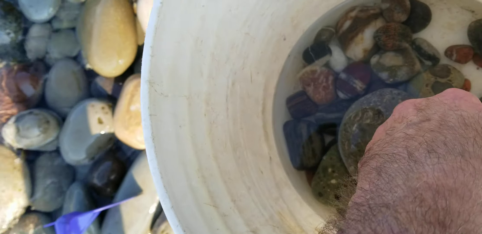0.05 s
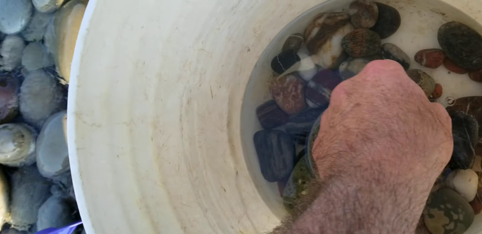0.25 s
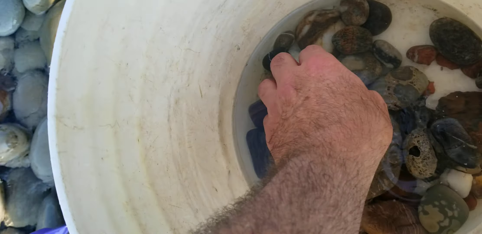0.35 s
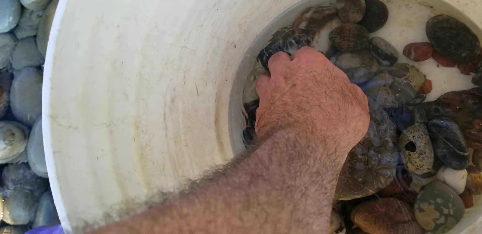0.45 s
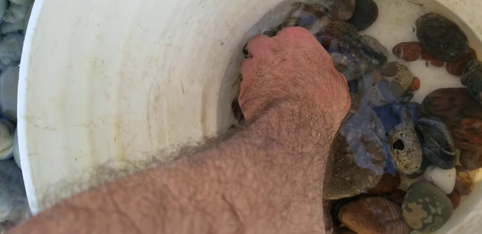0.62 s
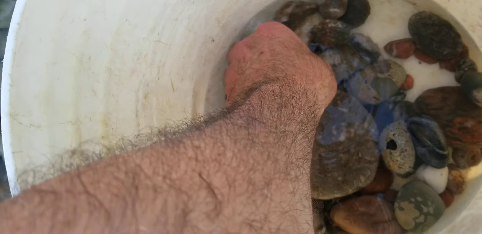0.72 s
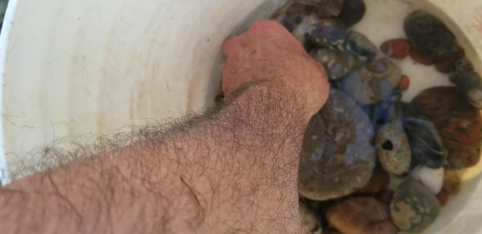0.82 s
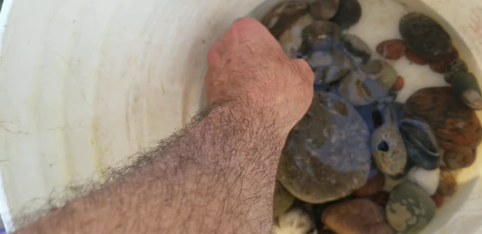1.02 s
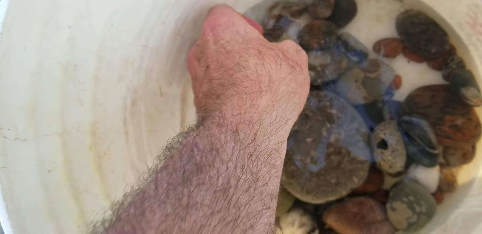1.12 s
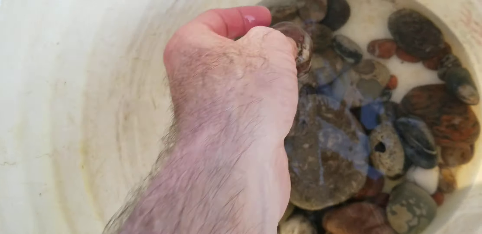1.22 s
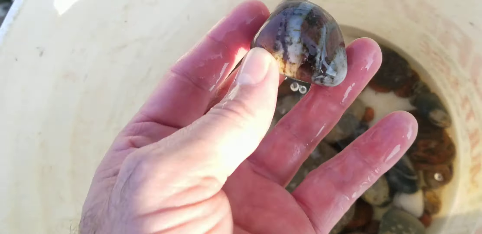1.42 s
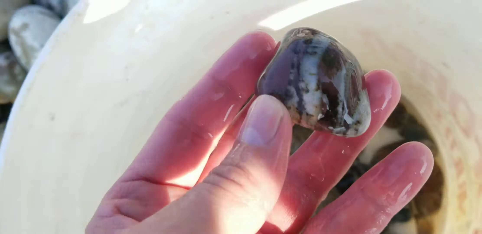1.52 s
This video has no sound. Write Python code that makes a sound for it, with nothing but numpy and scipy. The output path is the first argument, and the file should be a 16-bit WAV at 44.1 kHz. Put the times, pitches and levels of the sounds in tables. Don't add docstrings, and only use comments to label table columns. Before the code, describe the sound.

Wet stones clack and knock in a plastic bucket as a hand digs, then water drips.

```python
import sys
import numpy as np
from scipy import signal
from scipy.fft import rfft, irfft
from scipy.io import wavfile
from scipy.ndimage import uniform_filter1d

SR = 44100
rng = np.random.default_rng(int(sys.argv[2]) if len(sys.argv) > 2 else 0)


def boost_factor(decibels):
    exponent = np.asarray(decibels, float) / 20
    return 10 ** exponent


def inscribe(sig):
    pcm = np.round(np.clip(np.atleast_2d(sig).T, -1, 1) * 32767)
    wavfile.write(sys.argv[1], SR, pcm.astype(np.int16))


N = 68355

WET = dict(tick_db=-8, ring_db=10, top_db=-3, rise_s=0.00068, modes_db=-13)


def evened(x):
    return x / np.sqrt(np.mean(x ** 2) + 1e-20)


def peaked(x):
    power = uniform_filter1d(x.mean(0) ** 2, 130)
    return x / np.sqrt(power.max() + 1e-20)


def read(points, hz):
    f, value = np.transpose(points)
    return np.interp(np.log(hz + 1), np.log(f + 1), value)


def along(points):
    return np.interp(np.arange(N) / SR, *np.transpose(points))


def add(mix, s, sound):
    part = mix[:, round(s * SR):][:, :sound.shape[1]]
    part += sound[:, :part.shape[1]]


def sequence(rows, sound, **touch):
    out = np.zeros((2, N))
    for s, *row in rows:
        add(out, s, sound(*row, **touch))
    return out


def coloured(x, points):
    hz = abs(np.fft.fftfreq(2048, 1 / SR))
    log_gain = np.log(boost_factor(read(points, hz)))
    spectrum = np.exp(np.conj(signal.hilbert(log_gain)))
    taps = np.fft.ifft(spectrum).real[:1024]
    return signal.fftconvolve(x, taps[None], axes=1)[:, :x.shape[1]]


def noise_pair(count, same):
    a, b = rng.standard_normal((count, 2)).T
    same = np.clip(same, 0, 1)
    return np.array([a, same * a + np.sqrt(1 - same ** 2) * b])


def wobbly(count, depth):
    sway = uniform_filter1d(rng.standard_normal((count, 2)).T, 150, axis=1)
    return 1 + depth * evened(sway)


def across(x):
    lag = round(0.0004 * SR * rng.uniform(0.15, 1.2))
    late = np.r_[np.zeros(lag), x[1, :x.shape[1] - lag]]
    return np.array([x[0], late])


def rung(modes, t):
    spread_db = 3.0
    luck = rng.uniform(-1.43, 1, (len(modes), 4))
    out = 0
    for (f, db, t60), (a, b, c, d) in zip(modes, luck):
        decay = boost_factor(db + spread_db * a - 60 * t / t60)
        phase = 2 * np.pi * f * (1 + 0.013 * b) * t + np.array([[c], [d]])
        out = out + decay * np.sin(phase)
    return out


def field(points, same, patchy_db, size):
    f, s, z = signal.stft(noise_pair(N, same), SR, nperseg=size)
    patches = uniform_filter1d(rng.standard_normal(z.shape[1:]), 6, 0)
    patches = evened(uniform_filter1d(patches, 5, 1))
    gain = boost_factor(read(points, f)[:, None] + patchy_db * patches)
    return evened(signal.istft(z * gain, SR, nperseg=size)[1][:, :N])


def wind():
    # f/Hz, level/dB
    wind_spectrum = [(20, -52), (45, -7), (72, -1.5), (130, -12), (220, -27), (340, -32.5), (600, -37)]
    # t/s, level/dB
    gusts = [(0, -52), (.05, -41), (.12, -52), (.19, -45.5), (.25, -43), (.3, -51), (.45, -58.5),
             (.57, -47.5), (.7, -53.5), (.83, -45.5), (.95, -56), (1.4, -54), (1.55, -57)]
    rumble = field(list(wind_spectrum) + [(1200, -130)], 0, 0.84, size=2048)
    return boost_factor(along(gusts) + 6.5) * rumble


def wash():
    # f/Hz, level/dB
    water_spectrum = [(400, -13.5), (800, -14), (2500, -10.5), (3700, -15.5), (5600, -8), (8000, -21.5),
                      (11500, -13.5), (14300, -9.5)]
    # t/s, level/dB
    fade = [(0, 2.5), (.3, 4), (.6, -4.5), (1.1, -5.5), (1.55, -3)]
    water = field([(100, -63)] + list(water_spectrum), 0.033, 0.22, size=512)
    return boost_factor(-51.5 + along(fade)) * water


def drip(db, hz, t60, glide):
    t = np.arange(5000) / SR
    waver = 1 + 0.025 * evened(uniform_filter1d(rng.standard_normal(len(t)), 200))
    pitch = hz * waver * 2 ** (glide * t)
    tone = np.sin(2 * np.pi * np.cumsum(pitch) / SR)
    return boost_factor(db - 60 * t / t60) * np.minimum(t / 0.0015, 1) * tone * wobbly(len(t), 0.45)


def lapping():
    out = np.zeros((2, N))
    for when, size, pitch in rng.random((70, 3)):
        bubble = drip(-62.5 + 6 * size, 600 * 5 ** pitch, 0.07, 8 * size - 2)
        add(out, when * N / SR, bubble)
    return out


def dripping():
    # t/s, level/dB, f/Hz, t60/s, glide/(octaves/s)
    drips = [(1.15, -57, 620, 0.18, -3), (1.163, -66, 1610, .05, 2), (1.187, -52, 2030, 0.1, 0),
             (1.211, -51, 1680, 0.08, -7), (1.212, -51.5, 2860, 0.048, 5), (1.224, -52, 1770, 0.066, 3),
             (1.232, -52.5, 1017, 0.14, 12.5), (1.25, -60, 614, 0.17, 3.5), (1.267, -57, 1720, 0.084, 6),
             (1.315, -48, 2950, 0.035, -2.5), (1.335, -54, 2620, 0.091, -0.5), (1.366, -51, 943, 0.13, -4),
             (1.3775, -34.5, 2324, 0.084, -3), (1.381, -43, 2730, 0.07, 8), (1.408, -42.5, 2367, 0.058, -9),
             (1.408, -55, 860, 0.056, -3), (1.421, -48.5, 1570, 0.034, 2), (1.476, -52, 620, 0.085, 4),
             (1.479, -56.5, 1023, 0.093, 1.5), (1.497, -58, 1695, .08, 2)]
    return sequence(drips, drip)


def spit(db, hz):
    t = np.arange(1500) / SR
    fizz = noise_pair(len(t), 0.074) * np.minimum(t / 0.00077, 1) * boost_factor(-60 * t / 0.023)
    high = max(hz * 1.7, 12500)
    spectrum = [(hz * 0.5, -24), (hz * 0.8, -5), (hz, 0), (hz * 1.57, -15),
                (high, -7), (high * 0.68, -12)]
    return boost_factor(db) * peaked(coloured(fizz, spectrum))


def splashing():
    # t/s, level/dB, centre f/Hz
    spits = [(0.7652, -49.5, 5600), (0.971, -52.5, 12900), (1.1388, -46.5, 5700), (1.2226, -54, 6000),
             (1.2551, -50.5, 5750), (1.265, -55, 10000), (1.276, -50, 5500), (1.317, -52.5, 5160),
             (1.3678, -47, 5800), (1.377, -46.5, 5740), (1.3765, -44.5, 2020), (1.4225, -57, 6150),
             (1.4535, -54, 7640), (1.4674, -52, 6200), (1.4755, -64, 4900)]
    return sequence(spits, spit)


def thump(db):
    t = np.arange(9000) / SR
    hz = 245.2 * rng.uniform(0.97, 1.04)
    tone = np.sin(2 * np.pi * hz * t) * (1 - np.exp(-t / 0.0016))
    return boost_factor(db - 60 * t / 0.12) * np.array([tone, tone])


def landing():
    # t/s, level/dB
    thumps = [
        (0.309, -23.5),
        (0.348, -28.5),
        (0.461, -32.5),
        (0.499, -33.5),
        (0.645, -40),
        (0.696, -36),
        (0.854, -37.5),
        (0.93, -41.5),
        (1.084, -44),
    ]
    return sequence(thumps, thump)


def note(db, hz, t60):
    t = np.arange(9000) / SR
    phase = 2 * np.pi * hz * t + np.array([[0], [rng.uniform(-1.3, 1.3)]])
    return boost_factor(db - 60 * t / t60) * np.minimum(t / 0.0008, 1) * np.sin(phase) * wobbly(len(t), 0.35)


def chink(db, hz):
    t = np.arange(3000) / SR
    t60 = 0.028
    pair = rung([(hz, 0, t60), (hz, -5, t60)], t)
    return across(boost_factor(db) * np.minimum(t / 0.00078, 1) * pair)


def ringing():
    # t/s, level/dB, f/Hz, t60/s
    notes_of_stones = [(.6865, -47, 1247, .1), (.696, -27.5, 1252, 0.062), (.696, -32, 1706, 0.077),
                       (.697, -38, 2770, 0.036), (.9308, -27, 1867, 0.039), (.9308, -44, 1740, 0.022),
                       (1.0835, -28, 1224, 0.063), (1.0835, -22, 1922, 0.033), (1.0835, -30.5, 2500, 0.036),
                       (.3095, -20.5, 4280, .04), (.3095, -28, 5000, 0.032), (.347, -21.5, 6000, 0.047),
                       (.348, -36, 5060, .04), (.349, -32, 5630, 0.053), (.398, -15, 4560, 0.027),
                       (.398, -33, 5340, 0.028), (.355, -27, 1620, 0.077), (.497, -27, 1756, 0.041),
                       (.52, -32, 2810, 0.045)]
    # t/s, level/dB, f/Hz
    chinks = [
        (.4575, -23.5, 5520),
        (.496, -24.5, 5300),
        (.5195, -26.5, 5580),
        (.5195, -32, 4550),
    ]
    return sequence(chinks, chink) + sequence(notes_of_stones, note)


def grind():
    # t/s, level/dB
    hand = [
        (.2, -82),
        (.28, -55.5),
        (.58, -46),
        (.61, -66),
        (.68, -50.5),
        (.86, -46.5),
        (.9, -54),
        (1.05, -50),
        (1.12, -57.5),
        (1.16, -60.5),
    ]
    grit_hz = [1235, 1480, 1690, 1690, 1860, 2100, 1230, 2100, 1560, 2727]
    grits_per_s, grit_db = 900, 2
    effort = boost_factor(along([(0, -90), (0.18, -90)] + list(hand) + [(1.25, -90)]))
    grit = (rng.random(N) < grits_per_s / SR) * boost_factor(grit_db * np.minimum(rng.exponential(1, N), 4))
    kind = rng.integers(0, 10, N)
    out = np.zeros((2, N))
    for k in range(10):
        knock = blow(0, -24.5, -3, grit_hz[k], **WET) + thump(1)
        train = (grit * (kind == k))[None]
        out += signal.fftconvolve(train, knock, axes=1)[:, :N]
    return effort * evened(out) * boost_factor(2.5)


def blow(body_db, crack_db, air_db, hz, tick_db, ring_db, top_db, rise_s, modes_db):
    # f/Hz, t60/s
    wall_t60 = [(900, 0.15), (2400, 0.051), (6000, 0.057), (11000, 0.042)]
    # f/Hz, level/dB
    body_spectrum = [(450, -29.5), (1050, -6.5), (1600, 6.5), (2300, 5.5), (3100, -15.5), (4000, -57)]
    # f/Hz, level/dB
    crack_spectrum = [(1500, -14), (3200, -6.5), (4500, -3.5), (6200, -6.5), (7500, -13), (11000, -11),
                      (14500, -21.5), (16000, -75)]
    # f/Hz, level/dB, t60/s
    walls = [(1615, 0, .07), (1860, -1, .05), (2220, -8, .035), (2520, -10, .03)]
    # f/Hz, level/dB, t60/s
    chips = [(4370, -7, 0.032), (4680, -15, 0.035), (5180, -2.5, 0.02), (5760, -1, 0.037),
             (6280, 6, 0.0085)]
    # f/Hz, level/dB, t60/s
    air_modes = [(738, 2, 0.065), (773, -0.5, 0.061), (1225, -5, 0.043)]
    t = np.arange(9000) / SR
    rise = 1 - np.exp(-t / rise_s)

    f, s, z = signal.stft(noise_pair(len(t), 0.48), SR, nperseg=64)
    damping = boost_factor(-60 * s / read(wall_t60, f)[:, None])
    rattle = rise * signal.istft(z * damping, SR, nperseg=64)[1][:, :len(t)]
    rattle[:, 2] -= 10 * boost_factor(tick_db)
    rattle[[0, 1], rng.integers(5, 40, 2)] += 7 * boost_factor(tick_db)

    ring = note(0, hz, 0.037)
    body = peaked(coloured(rattle, body_spectrum)) + boost_factor(ring_db) * ring
    body = body + boost_factor(modes_db) * rise * rung(walls, t)

    top_db = top_db + 0.51 * (crack_db + 18)
    bright = [(f, db + top_db * (f > 7000)) for f, db in crack_spectrum]
    crack = peaked(coloured(rattle, bright)) + boost_factor(modes_db) * rise * rung(chips, t)
    crack_gain = boost_factor(crack_db + 2.6 * np.array([[-1], [1]]))

    air = rung(air_modes, t)[0] * wobbly(len(t), 0.48) * (1 - np.exp(-t / 0.0018))
    solid = across(boost_factor(body_db) * peaked(body) + crack_gain * peaked(crack))
    return solid + boost_factor(air_db + 4) * air


def striking():
    # t/s, body level/dB, crack level/dB, air column level/dB, stone f/Hz
    clacks = [(0.3088, -23, -18, -41.5, 1860), (.3128, -24.5, -23, -28.5, 1576),
              (.3165, -26, -32.5, -39.5, 1860), (.322, -34, -51, -51, 2550),
              (0.3466, -49, -15.5, -57, 1600), (0.3523, -28, -36, -29, 1664), (.358, -26.5, -34, -33, 1605),
              (.364, -28.5, -46, -32, 1760), (.376, -37, -59, -38, 1530), (0.3978, -22, -16.5, -37, 1560),
              (.401, -23, -23.5, -36, 2240), (0.452, -29.5, -29, -52, 2510),
              (0.4573, -24.5, -18.5, -38.5, 1480), (0.4961, -28, -27.5, -35, 1762),
              (0.5191, -30, -28, -37.5, 2200)]
    # t/s, body level/dB, crack level/dB, air column level/dB, stone f/Hz
    knocks = [(.5467, -39.5, -43, -48, 1260), (.5599, -41, -47.5, -59, 1820), (.567, -39, -53, -57, 1686),
              (.622, -52, -66, -51, 1910), (.64, -54, -72, -54, 2020), (.678, -53, -71, -53, 1730),
              (0.6856, -30.5, -41.5, -41, 1480), (0.6945, -32, -48, -50, 1290),
              (.701, -39, -60, -45.5, 1730), (.718, -42, -70, -44.5, 1740), (0.7432, -49, -74, -41.5, 1680),
              (.76, -47, -57.5, -46, 2100), (0.8, -41, -62, -58, 1300), (.807, -47, -60, -46, 1640),
              (.82, -40, -69, -51.5, 1810), (.838, -42, -58.5, -55, 1715), (.855, -46, -65, -48.5, 1520),
              (0.9305, -32, -47.5, -42.5, 1690), (0.9618, -38, -53.5, -46, 1680),
              (.967, -41.5, -60, -51, 1205), (1.012, -48, -80, -45, 1300), (1.0236, -42.5, -51, -50, 2070),
              (1.042, -44.5, -50.5, -44, 1560), (1.0828, -33.5, -47.5, -39, 1480),
              (1.1387, -47.5, -53.5, -80, 1710)]
    hard = dict(tick_db=3, ring_db=3.5, top_db=-0.5, rise_s=0.0001, modes_db=-1.5)
    return sequence(clacks, blow, **hard) + sequence(knocks, blow, **WET)


def scene():
    water = wash() + lapping() + dripping() + splashing()
    stones = landing() + ringing() + grind() + striking()
    return wind() + water + stones


def gated(x):
    f, s, z = signal.stft(x, SR, nperseg=512)
    power = (abs(z[:, :256]) ** 2).mean(0)
    power = np.repeat(power.reshape(32, 8, -1).mean(1), 8, 0)
    audible = power > boost_factor(2 * -35) * power[8:].max(0)
    keep = audible | (f[:256, None] < 6800)
    return signal.istft(z * np.r_[keep, keep[-1:]], SR, nperseg=512)[1][:, :N]


def roll_off(x):
    return signal.sosfilt(signal.butter(12, 15400, fs=SR, output="sos"), x)


def record(dry):
    # f/Hz, left minus right level/dB
    port_tilt = [(30, -12), (80, -6), (250, 0), (1000, -6), (2500, -4.5), (5500, -9), (8500, 2),
                 (14000, 0.5)]
    hz = np.fft.rfftfreq(N, 1 / SR)
    tilt = boost_factor(read(port_tilt, hz) / 2)
    ports = irfft(rfft(dry, axis=1) * np.array([tilt, 1 / tilt]), N, axis=1)
    ports = np.clip(ports, -0.95, 0.95)
    band_limit = boost_factor(-0.03 * np.maximum(hz - 14040, 0))
    wet = irfft(rfft(ports, axis=1) * band_limit, N, axis=1)
    return roll_off(gated(wet))


dry = scene()
out = record(dry)
inscribe(out)
```